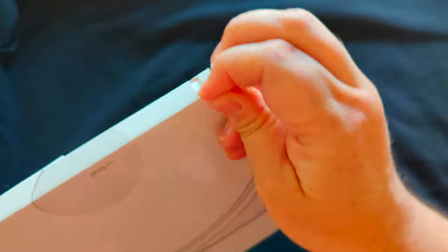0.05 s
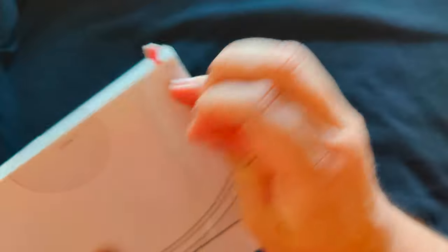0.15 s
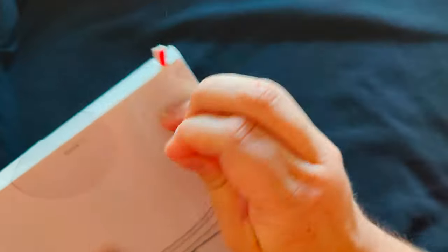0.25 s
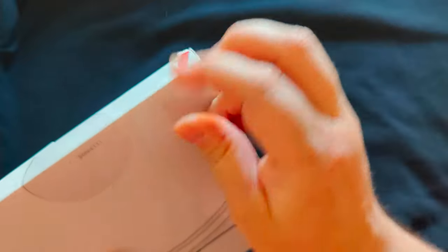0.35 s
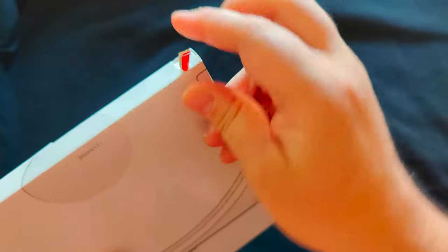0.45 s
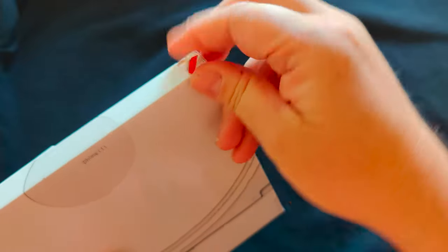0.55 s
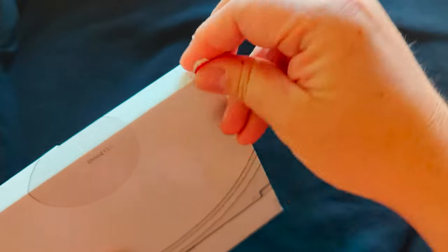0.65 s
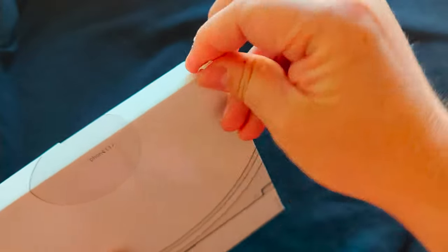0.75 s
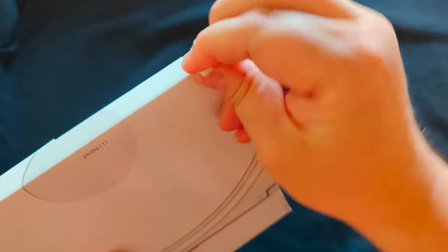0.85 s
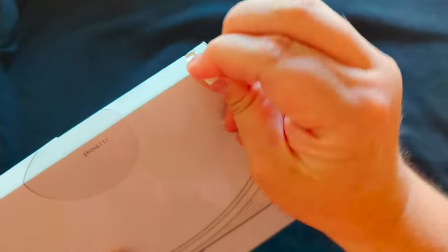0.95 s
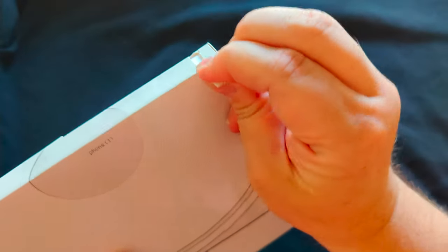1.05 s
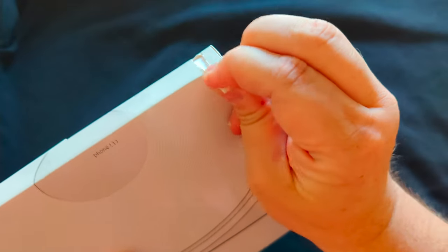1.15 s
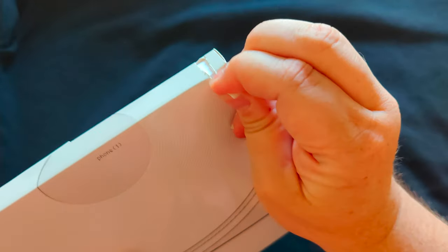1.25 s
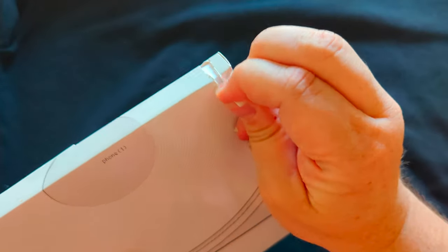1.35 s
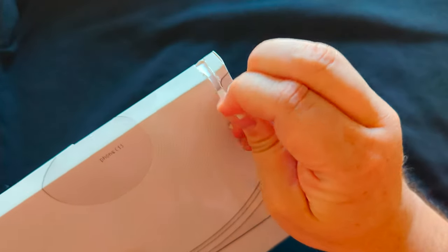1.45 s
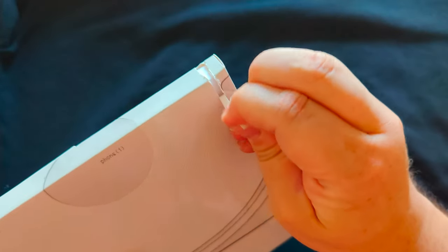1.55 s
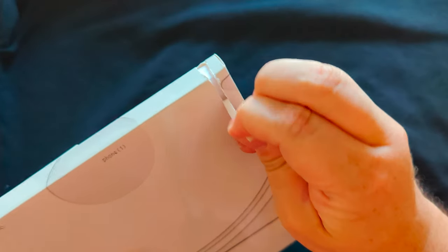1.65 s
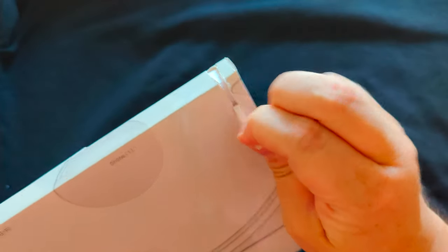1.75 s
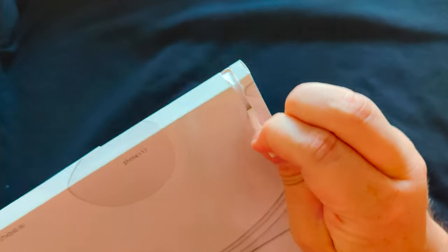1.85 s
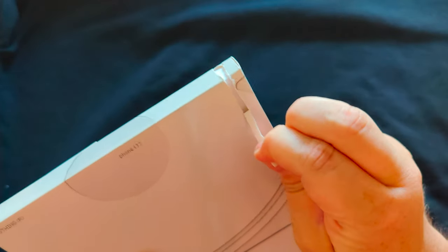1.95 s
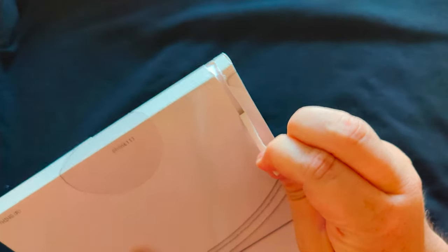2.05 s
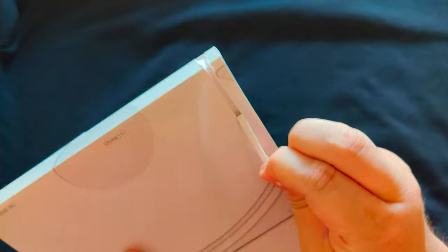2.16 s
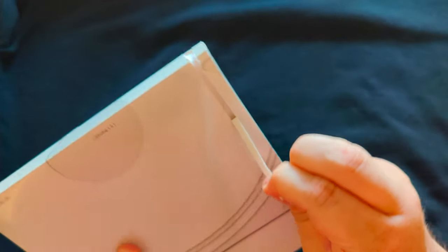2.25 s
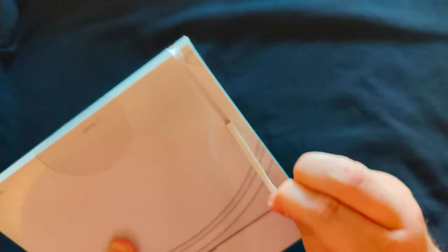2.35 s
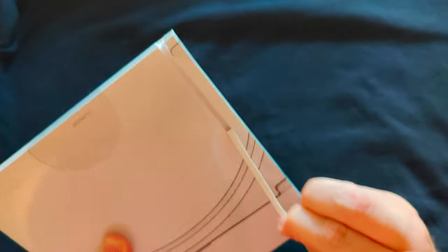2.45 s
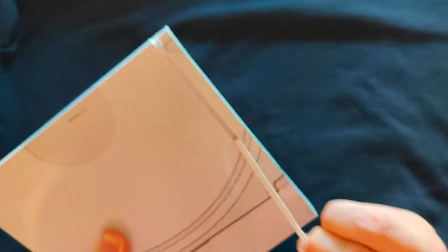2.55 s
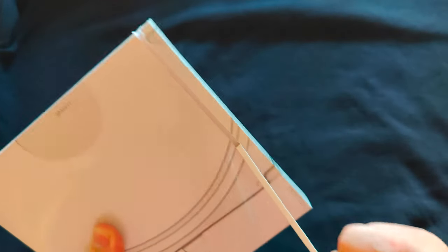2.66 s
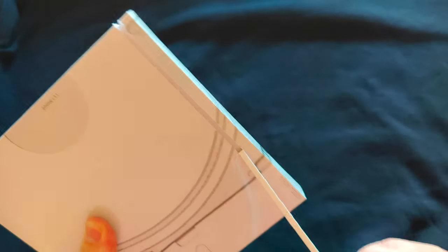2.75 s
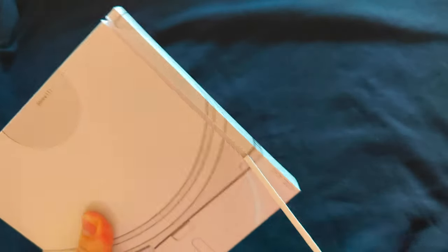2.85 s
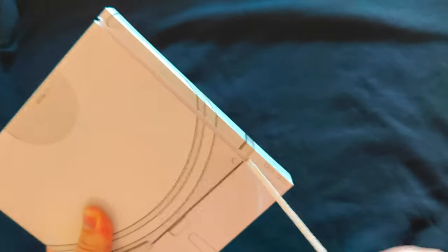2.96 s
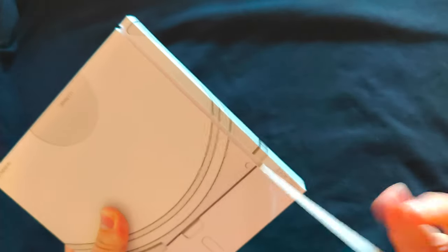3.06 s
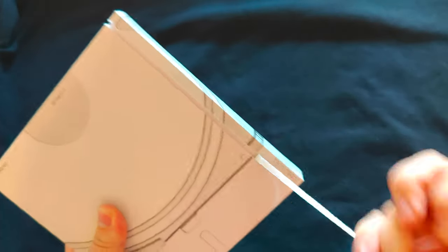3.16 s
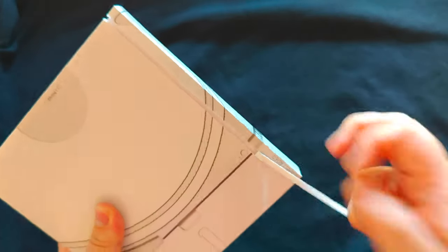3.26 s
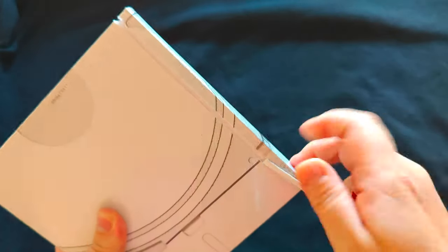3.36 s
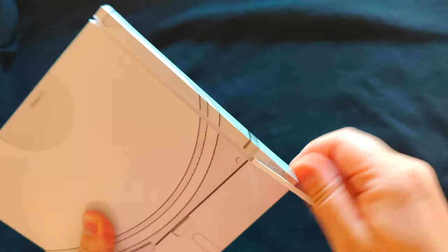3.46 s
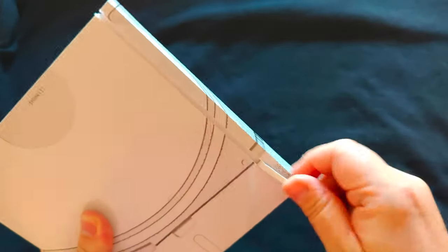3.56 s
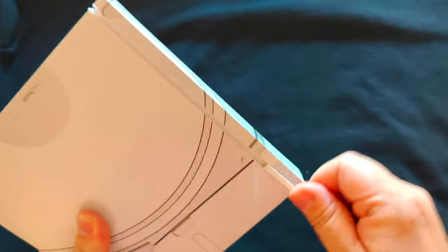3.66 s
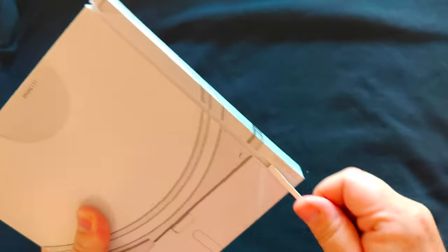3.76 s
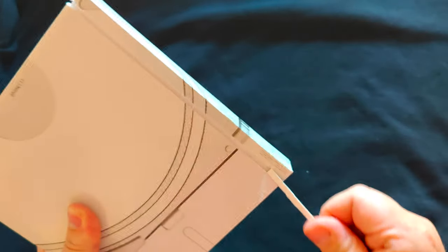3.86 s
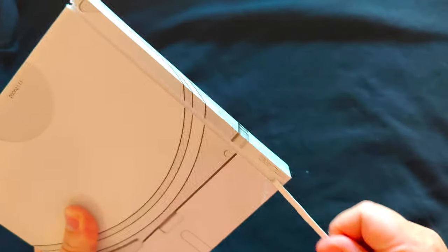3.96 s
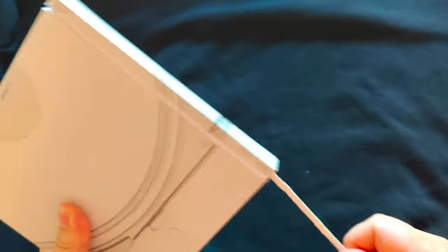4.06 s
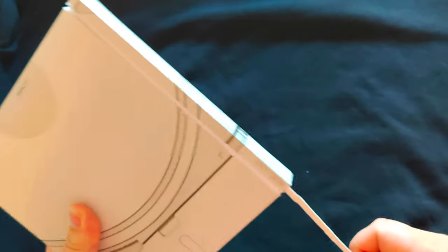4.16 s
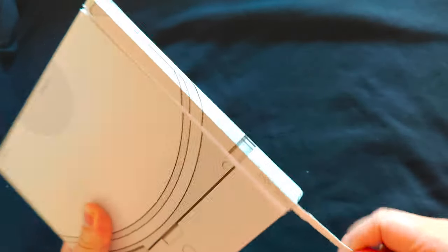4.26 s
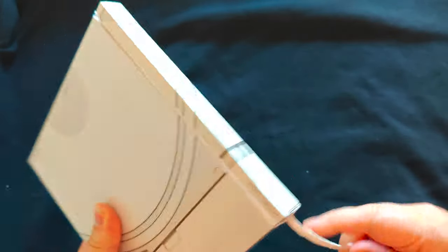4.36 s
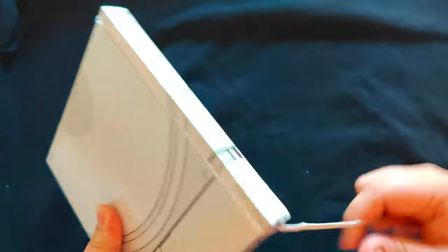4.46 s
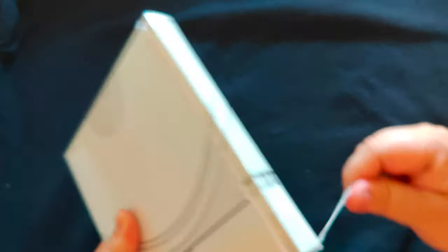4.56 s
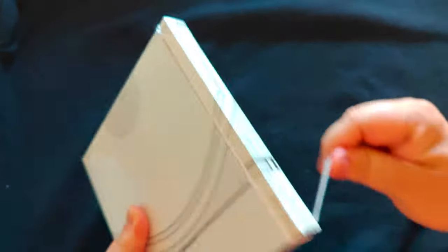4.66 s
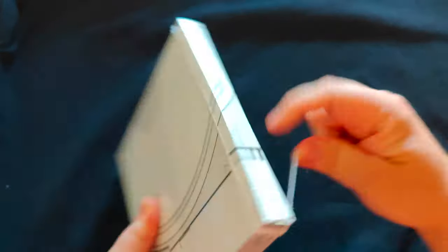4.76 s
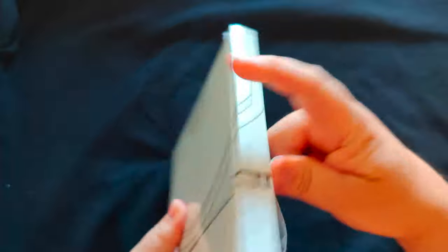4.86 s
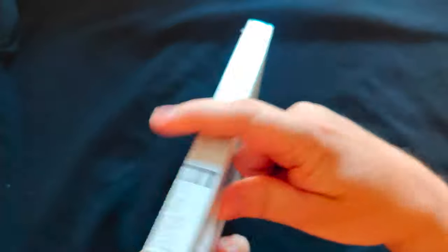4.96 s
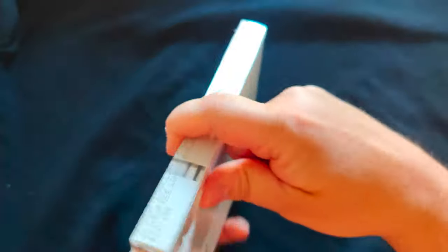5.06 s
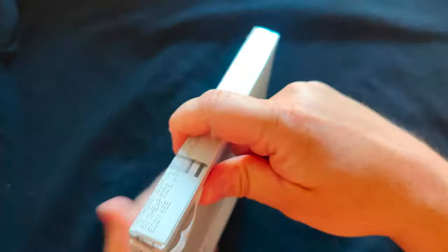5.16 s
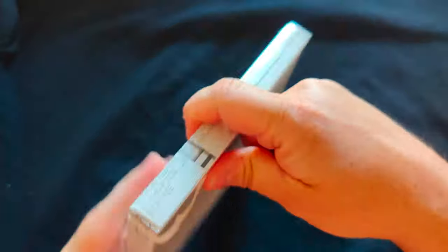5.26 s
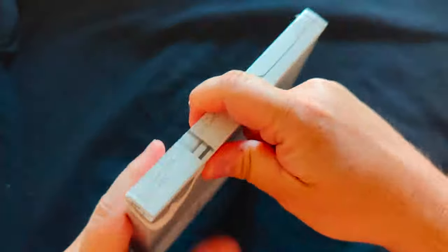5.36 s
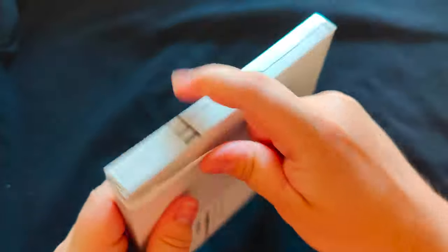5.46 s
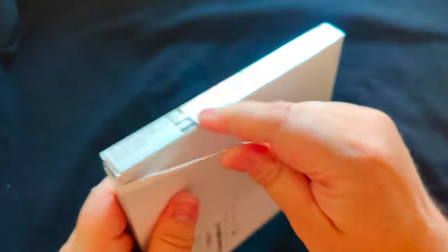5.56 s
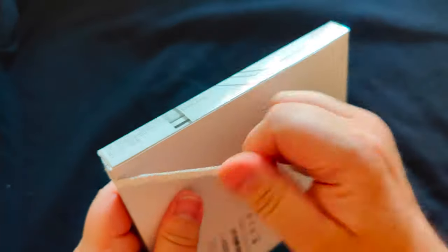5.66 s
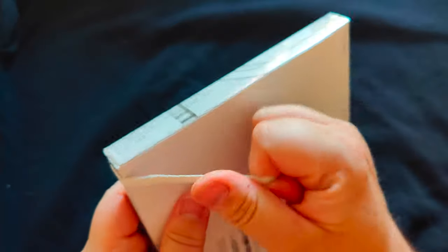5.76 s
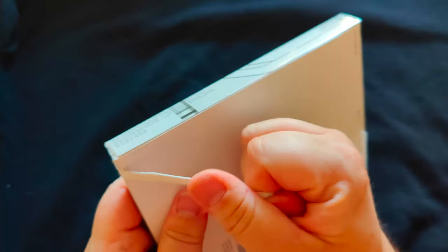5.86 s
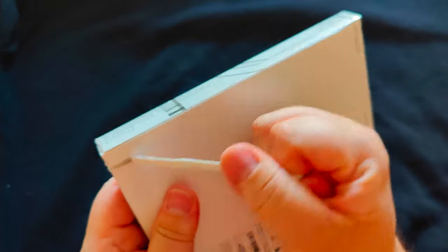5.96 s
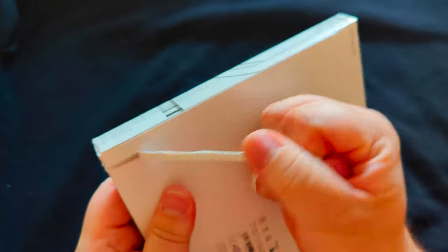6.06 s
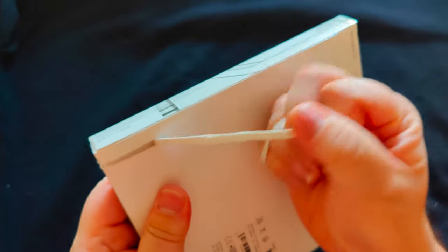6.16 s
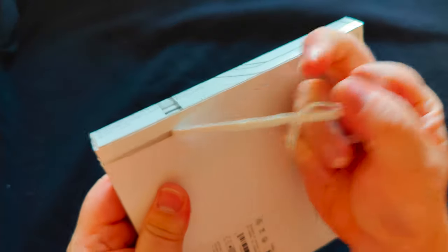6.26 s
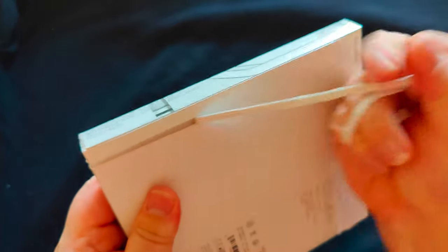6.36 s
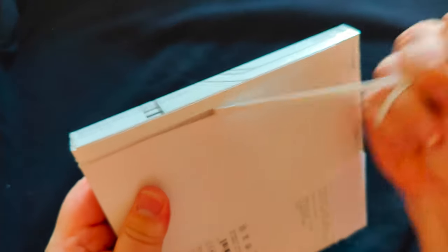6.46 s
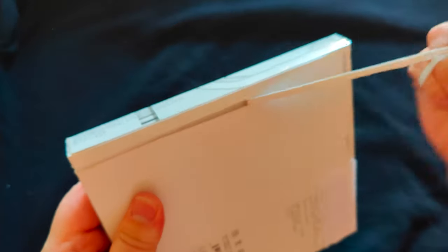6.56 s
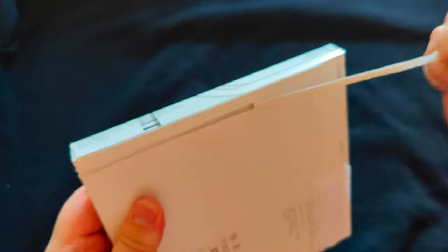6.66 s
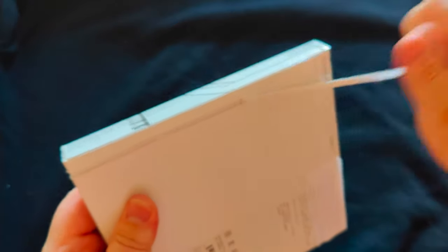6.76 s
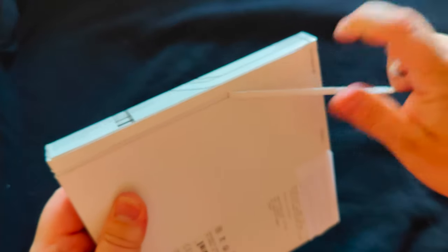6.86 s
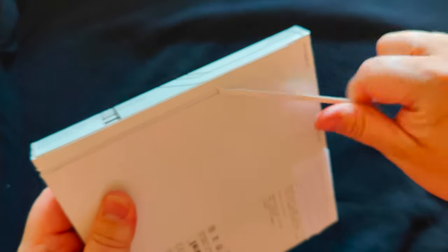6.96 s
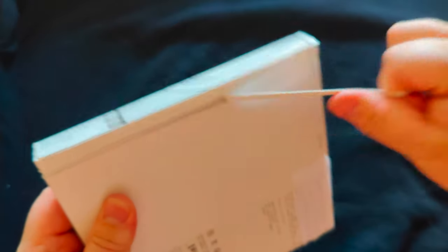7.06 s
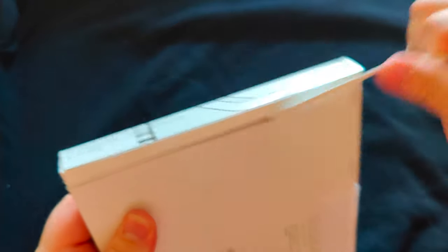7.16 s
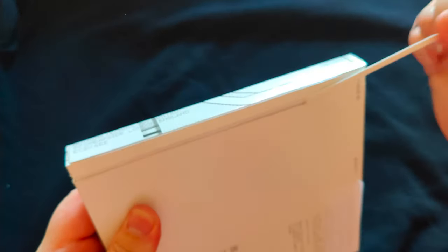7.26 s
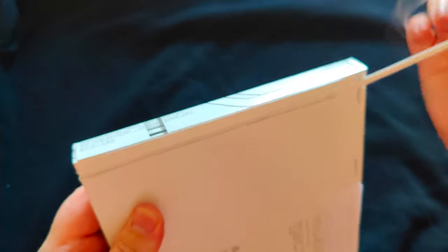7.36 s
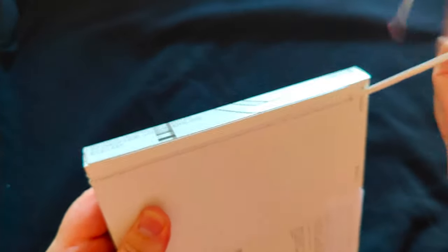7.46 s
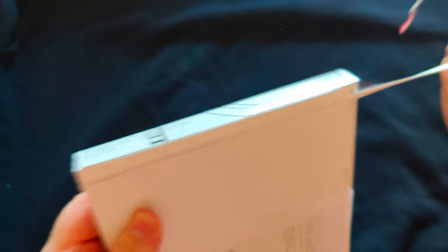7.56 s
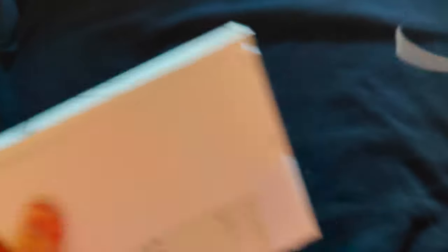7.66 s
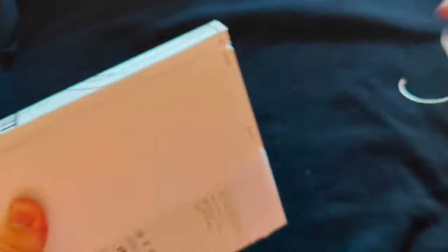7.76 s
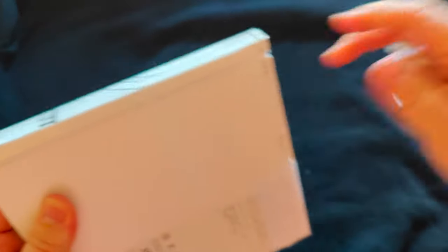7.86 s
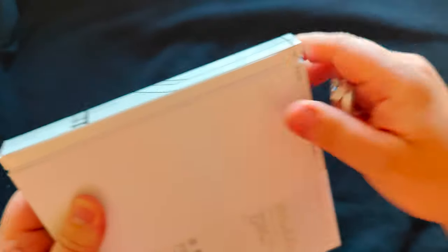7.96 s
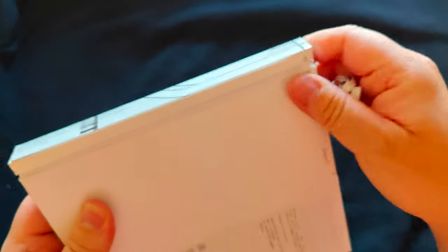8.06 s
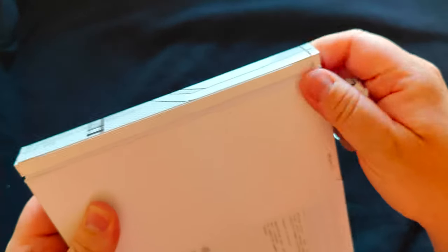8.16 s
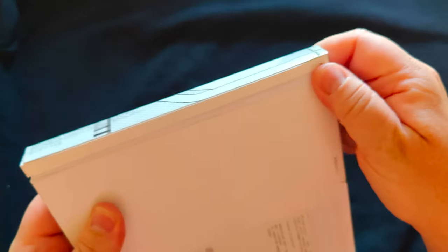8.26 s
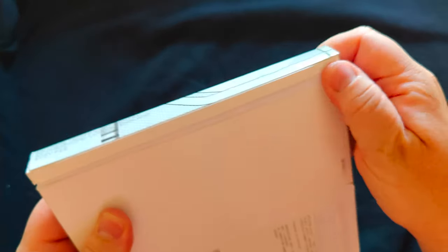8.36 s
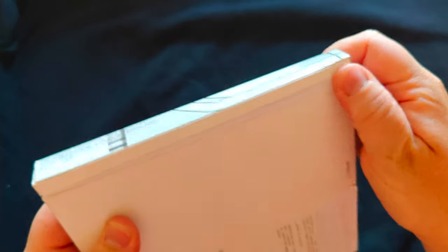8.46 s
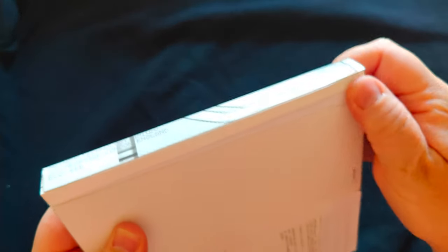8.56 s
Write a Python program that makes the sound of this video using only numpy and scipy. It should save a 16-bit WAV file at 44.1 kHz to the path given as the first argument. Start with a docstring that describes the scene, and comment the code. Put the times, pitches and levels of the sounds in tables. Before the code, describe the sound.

A hollow card box is opened by its tear strip, heard close up. Crackling, fibrous rips come in five pulls: tentative, long, short, then strong and fast, then brief and sizzling. Between them come dry finger rustles, sharp nail snaps, dull hollow taps and small low creaks of the box. The taut strip faintly rings and squeaks. The room is small and still, with short echo, faint low hum and soft hiss.

```python
"""Tear strip on a cardboard box

Small quiet room, flat hollow box close to the microphones: a tear strip is pulled round it in five pulls.
Fibres snap by the thousand along the front, then the back: bursts of noise crackle and shake box resonances.
The strip catches once and judders; it rings while taut, and narrow gliding noise gives groans and squeaks.
Fingers rustle, snap, tick and knock on the box; behind lie the room echo, still air, hum and a soft hiss.
"""
import sys
import numpy as np
from scipy import signal
from scipy.fft import rfft, irfft
from scipy.io import wavfile
from scipy.ndimage import uniform_filter1d, map_coordinates

SR = 44100
rng = np.random.default_rng(int(sys.argv[2]) if len(sys.argv) > 2 else 0)


def transcribe(signal):
    """Save signal, clipped to [-1, 1], as a 16-bit WAV file at the path in sys.argv[1]."""
    frames = np.atleast_2d(signal).T
    limited = np.clip(frames, -1, 1)
    pcm = np.round(limited * 32767).astype(np.int16)
    wavfile.write(sys.argv[1], SR, pcm)


N = 379911
TIME = np.arange(N) / SR

# Effort of each pull, which drives all its layers: t/s, level/dB
PEEL_EFFORT = [(1.22, -66.5), (1.402, -69), (1.446, -51.5), (1.504, -49.5), (1.546, -64.5), (1.676, -50),
               (1.79, -75), (1.814, -68), (1.86, -77)]
FRONT_EFFORT = [(1.915, -65), (1.971, -50), (2.043, -57), (2.115, -57), (2.121, -51.5), (2.177, -48.5),
                (2.201, -53), (2.475, -45), (2.557, -49.5), (2.673, -45), (2.863, -50), (2.985, -48),
                (3.1, -86.5)]
CORNER_EFFORT = [(3.59, -75), (3.598, -70), (3.71, -47.5), (3.722, -61), (3.758, -60), (3.864, -48.5),
                 (4.016, -57), (4.09, -51.5), (4.122, -41.5), (4.162, -59.5), (4.28, -76.5)]
BACK_EFFORT = [(5.968, -55), (6.006, -41), (6.05, -46.5), (6.064, -52), (6.082, -57), (6.09, -45.5),
               (6.098, -48), (6.192, -40), (6.26, -56), (6.332, -41), (6.464, -46), (6.582, -40),
               (6.668, -58.5), (6.746, -54), (6.84, -86)]
FINISH_EFFORT = [(7.16, -81), (7.196, -66.5), (7.256, -49.5), (7.316, -51.5), (7.33, -52.5), (7.378, -51.5),
                 (7.482, -49.5), (7.548, -68), (7.654, -45.5), (7.668, -76), (7.72, -69)]
# Relative colour of the snapping fibres on each pull, and under the fingers: f/Hz, density/(dB per Hz)
PEEL_COLOUR = [(900, -36), (1500, -5.5), (1950, -22), (2300, -4), (3300, -6), (3650, -8), (4300, -4.5),
               (5200, -8.5), (6200, -9.5), (10000, -8), (14000, -4)]
FRONT_COLOUR = [(880, -13), (1500, -5), (1690, -6.5), (2020, -13), (2480, 1), (2940, -1), (3290, -1.5),
                (4690, -2), (5710, -6.5), (7630, -4.5), (8530, -7), (10100, -1.5), (13400, 5.5), (14000, 5)]
CORNER_COLOUR = [(880, -39), (1500, -3), (2560, -6), (3230, 1), (5200, -3), (6090, 0.5), (6630, -4.5),
                 (7490, 3.5), (8690, -4.5), (14000, 10.5)]
BACK_COLOUR = [(880, -16), (1500, -6), (1860, -16.5), (2350, -6), (2650, -11), (2830, -7.5), (3710, -1),
               (5200, -2), (6690, -4.5), (7700, 1), (8530, -5), (9910, -3), (11100, -1.5), (14000, 4)]
FINISH_COLOUR = [(880, -39), (1500, -10.5), (3320, -11.5), (4150, -7.5), (4820, -9), (5350, -11),
                 (6040, -10), (6950, -11), (10300, -9), (14000, -4)]
HANDLING_COLOUR = [(880, -35), (1500, -4), (2460, -7.5), (3050, -4), (3410, -5), (4120, -0.5), (11900, -3),
                   (14000, -6)]
# Balance and place of each pull, levels against its effort (sizzle and shaking as at mid-pull):
# crackle/dB, sizzle/dB, box flex/dB, panel rattle/dB, right-channel lag/ms, left upper-mid boost/dB
PEEL_BALANCE = (-3, -9.5, -21, -15.5, 0.7, 2)
FRONT_BALANCE = (-1.5, -3, -9, -8.5, -0.1, 2)
CORNER_BALANCE = (-1.8, -1, -7.5, -6, 0, 1)
BACK_BALANCE = (-1.7, -0.5, -20, -9.5, 0.4, 2.8)
FINISH_BALANCE = (-1.7, 6.5, -6.5, -2, 0.1, -2)
# From start to end of a pull the freed strip lengthens: more sizzle, less shaking of the box
SIZZLE_RISE_DB, SHAKE_FALL_DB = 7, 5
SHAKE_GROWTH = 1.39   # dB of shaking per dB of effort
SWAY_DB, SWAYS_PER_S = 1.5, 18   # the shaking comes and goes as the box shifts in the hand
# Slow bending modes of the whole box, before hand damping: f/Hz, width/Hz, level/dB
FLEX_MODES = [(135, 43, 0), (234, 30, -0.5), (302.5, 73, -6.5), (369, 54, -1.5), (427, 240, 2)]
# Quicker modes of the panels, before hand damping: f/Hz, width/Hz, level/dB
PANEL_MODES = [(703, 186, 10), (820, 97, -14), (950, 120, -3.5), (1100, 750, -6), (1260, 120, -14),
               (1780, 670, 6)]
HAND_DAMPING = 2.7   # how many times the grip widens these modes in a knock
# The strip catches once
JUDDER_S, JUDDER_HOLD_S, JUDDER_DB, SLIPS_PER_S = 6.524, 0.07, -44, 315
JUDDER_ATTACK_S, JUDDER_RELEASE_S = 0.0067, 0.033
# Ring of the taut strip in the first two pulls, rising as the tear runs on: t/s, f/Hz
RING_PITCH = [(1.45, 2526), (2.05, 2595), (2.55, 2923), (3.0, 3033)]
PEEL_RING_DB, FRONT_RING_DB = -8, -12   # against the effort
# Resonance of the back wall, lower as more of it comes loose: t/s, f/Hz
WALL_PITCH = [(6.1, 950), (6.21, 720), (6.36, 640), (6.47, 420), (6.6, 378.6)]
WALL_DB, WALL_HALF_WIDTH_HZ = -12, 130   # level against the effort
# Groans of the box as the grip tightens or slides: start/s, length/s, first f/Hz, last f/Hz, level/dB
GROANS = [(.176, 0.022, 190.2, 179, -46.5), (.24, 0.067, 176.3, 196, -62), (2.14, .13, 240.2, 215, -60.5),
          (2.43, .12, 204.7, 180.4, -55), (2.61, .12, 215.9, 201.5, -54), (3.605, 0.098, 235, 255, -54),
          (3.745, 0.094, 300, 225, -51), (3.89, 0.13, 238.7, 188.3, -53), (4.01, .12, 150, 130, -55.5),
          (5.015, .06, 309, 270, -63), (5.805, 0.061, 310, 214.5, -54.5),
          (5.868, 0.041, 189.9, 160.4, -49.5), (5.915, 0.051, 151, 128, -52), (7.205, .06, 201, 330, -57),
          (7.644, 0.029, 310, 442, -46.5), (8.19, 0.095, 389, 428, -70)]
# Squeaks of the strip dragging through the slit: start/s, length/s, first f/Hz, last f/Hz, level/dB
SQUEAKS = [(5.985, 0.057, 5060, 4960, -43), (6.29, .09, 5380, 5400, -44.5), (7.324, 0.017, 4890, 5130, -43)]
# Fingers and loose strip sliding on the box: start/s, length/s, level/dB,
# sizzle against level/dB, shaking of the box against level/dB
RUSTLES = [(0.0, 0.076, -68, -1, -2), (0.067, 0.078, -64.5, -7, -12), (0.183, 0.15, -72, -11, 7.5),
           (0.923, 0.065, -57.5, -5, -10.5), (0.997, .1, -71.5, -12, -22), (1.121, 0.082, -63, -5, -24),
           (1.197, 0.11, -73, -6, -21), (3.17, 0.095, -75.5, -10, -4), (3.315, 0.054, -69.5, 3, -26),
           (4.323, 0.071, -77, 4, 2), (4.524, 0.23, -76, 4, -2.5), (4.842, 0.19, -64.5, -4, -12),
           (4.923, .035, -66, -10, 9), (4.996, 0.11, -76, -1, 6), (5.095, 0.08, -71.5, -13, -16),
           (5.196, 0.065, -78, -12, 3), (5.278, .05, -72, -13, -13), (5.465, .04, -68, -11, 0),
           (5.49, .11, -81, -10, 6), (5.664, 0.13, -69, 6.5, -14), (7.107, 0.052, -75, 12.5, -11),
           (7.187, 0.034, -61.5, 9, -16), (7.559, 0.084, -63.5, 15, -10), (7.723, 0.039, -62, 0, -20),
           (8.025, 0.034, -76, 3, 8), (8.478, 0.12, -74.5, -9, -10)]
RUB_PEAK_SHARE, RUSTLE_PEAK_SHARE = 0.4, 0.26   # how far into a stroke it is loudest
# Sharp snaps of card and fingernail: t/s, centre peak/dB,
# filter gains against the 3540-8300 Hz band: bite/dB, sizzle/dB
SNAPS = [(0.188, -33.5, -13, 6), (.195, -30, -9, -11), (.935, -42.5, -8, 9), (1.1501, -42.5, -1, -12),
         (1.206, -36.5, 2.5, 0), (1.448, -32.5, 10, 2), (1.4555, -35, 4, 6), (1.6184, -35, 3, 2),
         (1.668, -32.5, 18, 2), (1.8118, -44.5, 27, -6), (1.907, -38.5, 36, -6), (2.1229, -33, -11, 3),
         (2.6854, -31, -6, 14), (3.164, -51.5, 29, -5), (3.332, -43.5, -17, 5), (3.4885, -29, -30, -3.5),
         (3.5512, -40, 14, 6), (3.704, -29, -6, -20), (4.1219, -26, -8, 1), (4.6178, -48.5, -10, 13),
         (4.9334, -45, 12, -6), (4.9978, -40.5, 20, 6), (5.3143, -40, 19, 1), (5.3536, -31.5, 17.5, 3),
         (5.484, -34, 0, -8.5), (5.512, -45, 11, 10), (5.668, -41.5, -9, -8), (5.7595, -47, -9, 14),
         (5.7842, -42, -26, -14), (5.955, -34, 10, -4), (6.0891, -30.5, 4, -20), (6.8687, -34.5, -18, 3),
         (7.5092, -37, -16, 4), (7.57, -38, -19, 14), (7.5814, -38, -19, 18), (7.616, -34, -2, 20),
         (7.6274, -43, -13, 19), (7.6442, -28, 8, 9), (7.739, -42, -15, -2), (8.082, -51, 13, 0)]
SNAP_T60_S = 0.0057
# Loose strip brushing on after a snap: t/s, starting level/dB, t60/s
BRUSHES = [(0.189, -58, 0.1), (3.49, -58.5, 0.35), (5.353, -50.5, 0.19)]
# Knocks and pops of the box, duller under a soft fingertip:
# t/s, peak/dB, relative thud/dB, relative flex/dB, relative panel/dB, top f/Hz
KNOCKS = [(.184, -50, -12, -2, 2, 2400), (.194, -39.5, -6, -10, -11, 2400), (.936, -53, -6, -11, -2, 2500),
          (3.425, -52, -25, 0, -12, 2500), (3.489, -40, -27, -9, -8, 2520),
          (3.553, -45.5, -25, -6.5, -12, 2500), (3.703, -35, -30, -23, 4, 2500),
          (4.134, -37, -30, -15, 3, 2500), (4.933, -40.5, -25, -4, -1, 2800),
          (4.9961, -27, -27, -9.5, -18, 2500), (5.355, -37.5, -9.5, -13, -17.5, 1600),
          (5.484, -35, -10.5, -14, -2.5, 2200), (5.51, -34.5, -30, -3, -4.5, 2500),
          (5.667, -51, -17, -19, -14, 1190), (5.784, -23, -22, -8.5, -10.5, 1310),
          (5.9568, -27, -24, -20.5, -13.5, 2400), (7.648, -36, -34, -9, -9, 2000),
          (8.597, -43, -35, -41, -1, 1110)]
# Faint ticks of the card in the holding hand; the spread adds to the level at random
TICKS_PER_S, TICK_DB, TICK_SPREAD_DB = 9, -66, 4
# Room echo by band: low f/Hz, high f/Hz, t60/s, level before band-pass/dB
ROOM = [(84, 326, 0.33, -7.5), (520, 1200, 0.27, -7), (1920, 12400, 0.23, -5.5), (7000, 9400, 0.076, -11)]
# Relative colour of the still room: f/Hz, density/(dB per Hz)
AIR_COLOUR = [(15, -37), (25, -1.5), (53, -2), (102, -15.5), (137, -17.5), (249, -17.5), (394, -20.5),
              (439, -20), (503, -25), (545, -24), (695, -27), (988, -23.5), (3430, -38), (14400, -40.5),
              (16000, -33)]
AIR_DB = -66.5
HUM_HZ, HUM_HALF_WIDTH_HZ, HUM_DB = 60.4, 4.7, -76
HISS_FROM_S, HISS_RISE_S, HISS_DB = 3, 2.9, -77
CUTOFF_HZ = 16100


def strip():
    """The strip tears along the box; effort drives every layer, and each pull has its own colour and place."""
    pulls = [(PEEL_EFFORT, PEEL_COLOUR, PEEL_BALANCE), (FRONT_EFFORT, FRONT_COLOUR, FRONT_BALANCE),
             (CORNER_EFFORT, CORNER_COLOUR, CORNER_BALANCE), (BACK_EFFORT, BACK_COLOUR, BACK_BALANCE),
             (FINISH_EFFORT, FINISH_COLOUR, FINISH_BALANCE)]
    stretches = []
    for pull, tone, balance in pulls:
        crackle_db, sizzle_db, flex_db, panel_db, lag_ms, pan_db = balance
        start_s, end_s = pull[0][0], pull[-1][0]
        freed = progress(start_s, end_s - start_s) - 0.5   # zero at mid-pull
        drive = effort(pull)
        shake = drive.max() * (drive / drive.max()) ** SHAKE_GROWTH
        shake = shake * from_db(-SHAKE_FALL_DB * freed)
        gains = [drive * from_db(crackle_db),
                 drive * from_db(sizzle_db + SIZZLE_RISE_DB * freed),
                 shake * from_db(flex_db),
                 shake * from_db(panel_db)]
        stretches.append((gains, tone, lag_ms, pan_db))
    front, back = stretches[:3], stretches[3:]
    gritty = fractures(per_s=550, spread_db=2.5, burst_ms=0.53, bed=0.88, pricks_per_s=45, prick_db=20.0)
    # the back tears faster
    fine = fractures(per_s=700, spread_db=2.5, burst_ms=0.5, bed=0.88, pricks_per_s=60, prick_db=16.5)
    return tear(front, gritty) + tear(back, fine)


def tear(stretches, force):
    """The same fractures crackle in the air, sizzle at the top and shake the box.

    Each stretch: (crackle, sizzle, flex and panel gains), colour, lag/ms, pan/dB.
    """
    _, sizzle_gain, flex_gain, panel_gain = sum(np.array(gains) for gains, tone, lag_ms, pan_db in stretches)
    snapping = force * stereo_noise(likeness=0.29)
    snapping = shifting_echo(snapping, delay_ms=0.436, swing=0.25, strength=0.36, per_s=9)
    crackle = 0
    for gains, tone, lag_ms, pan_db in stretches:
        coloured = band(colour(snapping, tone), 1420, 11480, order=4)
        crackle = crackle + gains[0] * place(coloured, lag_ms, pan_db)
    treble = band(force * stereo_noise(likeness=0.55), 12700, 16500, order=3)
    sizzle = sizzle_gain * rms_one(treble)
    shake = force * stereo_noise(likeness=0.86)
    shake = shifting_echo(shake, delay_ms=3.25, swing=0.247, strength=0.46, per_s=6)
    bending = flex_gain * rms_one(flex(shake) * from_db(SWAY_DB * drift(SWAYS_PER_S)))
    rattling = panel(shake) * from_db(SWAY_DB * drift(SWAYS_PER_S))
    rattle = panel_gain * place(rattling, lag_ms=0.024, pan_db=2.4)
    return crackle + sizzle + bending + rattle


def fractures(per_s, spread_db, burst_ms, bed, pricks_per_s=32, prick_db=20):
    """Force envelope: fibre bundles break in brief bursts over a bed of single fibres; stiff ones prick out."""
    sizes = from_db(spread_db * np.minimum(rng.exponential(1, N), 4))
    breaks = (rng.random(N) < per_s / SR) * sizes ** 2
    burst_decay = np.exp(-1000 / (burst_ms * SR))
    power = signal.lfilter([1], [1, -burst_decay], breaks + 1e-18)
    # the hand keeps the mean effort even
    steady = uniform_filter1d(power, size=1500) + 0.15 * power.mean()
    pricks = (rng.random(N) < pricks_per_s / SR) * from_db(prick_db)
    return np.sqrt(power / steady + abs(bed)) + pricks


def flex(force, damping=1):
    """The hollow box bending."""
    return band(resonate(force, FLEX_MODES, damping), 127, 400)


def panel(force, damping=1):
    """The stiff panels rattling."""
    return band(resonate(force, PANEL_MODES, damping), 660, 1466)


def judder():
    """Stick and slip: uneven, nearly periodic tugs on the box."""
    wobble = rms_one(uniform_filter1d(rng.standard_normal((1, N)), size=150))[0]
    slip_count = np.floor(np.cumsum(SLIPS_PER_S * (1 + 0.14 * wobble)) / SR)
    slips = np.diff(slip_count, prepend=0) * np.ones((2, 1))
    caught = progress(JUDDER_S - JUDDER_ATTACK_S, JUDDER_ATTACK_S)
    caught = caught - progress(JUDDER_S + JUDDER_HOLD_S, JUDDER_RELEASE_S)
    bending = from_db(0.5) * rms_one(band(flex(slips), 180, 1000))
    return from_db(JUDDER_DB) * caught * (bending + rms_one(panel(slips)))


def taut_strip_ring():
    """The taut strip rings with the effort of the first two pulls."""
    taut = from_db(PEEL_RING_DB) * effort(PEEL_EFFORT) + from_db(FRONT_RING_DB) * effort(FRONT_EFFORT)
    return rub(taut, np.interp(TIME, *np.transpose(RING_PITCH)), half_width_hz=110)


def back_wall():
    """The loosening back wall resonates with the effort of the tear."""
    gain = from_db(WALL_DB) * effort(BACK_EFFORT)
    return rub(gain, np.interp(TIME, *np.transpose(WALL_PITCH)), WALL_HALF_WIDTH_HZ)


def groans():
    """Creeping fingers drive a low resonance of the box."""
    return rub(*glides(GROANS), half_width_hz=58)


def squeaks():
    """The strip drags through the slit and drives a high, broad resonance."""
    return rub(*glides(SQUEAKS), half_width_hz=355)


def fingers(crackle_db=-1, panel_db=-4):
    """Skin and the loose strip slide over the card with sparse little catches."""
    gains = 0
    for s, length_s, db, sizzle_db, shake_db in RUSTLES:
        layers_db = db + np.array([crackle_db, sizzle_db, shake_db, shake_db + panel_db])
        gains = gains + np.outer(from_db(layers_db), stroke(s, length_s, RUSTLE_PEAK_SHARE))
    force = fractures(per_s=330, spread_db=5.5, burst_ms=0.99, bed=1.0)
    return tear([(gains, HANDLING_COLOUR, 0.02, 1.2)], force)


def snaps():
    """The card strains for some milliseconds, then cracks."""
    out, t = np.zeros((2, N)), TIME[:1500] - TIME[600]
    strain = (t < 0) * from_db(-23 - 60 * np.abs(t) / 0.03)
    give = (t >= 0) * from_db(-60 * np.abs(t) / SNAP_T60_S)
    for s, peak_db, bite_db, sizzle_db in SNAPS:
        burst = stereo_noise(likeness=0.13, size=len(t)) * (strain + give)
        bite = from_db(bite_db) * band(burst, 2080, 4730)
        sizzle = from_db(sizzle_db) * band(burst, 10800, 14500, order=3)
        crack = bite + band(burst, 3540, 8300) + sizzle
        crack = crack / np.abs(crack.mean(axis=0)).max()
        # slightly nearer the left
        add(out, s + t[0], from_db(peak_db) * from_db([[0.4], [-0.4]]) * crack)
    return out


def brushes():
    """After some cracks the loose strip brushes along the box: noise that dies away."""
    out = np.zeros((2, N))
    brush = rms_one(band(stereo_noise(likeness=0.36), 1500, 8300, order=1))
    for s, db, t60 in BRUSHES:
        out += brush * (TIME > s) * from_db(db - 60 * np.abs(TIME - s) / t60)
    return out


def knocks():
    """A brief push rocks the whole box and rings its modes, which the holding hand damps at once."""
    out, t = np.zeros((2, N)), TIME[:4096]
    for s, peak_db, thud_db, flex_db, panel_db, top_hz in KNOCKS:
        scrape = 0.059 * stereo_noise(likeness=0.59, size=len(t)) * from_db(-60 * t / 0.022)
        push = (t == 0) + scrape
        thud = band(resonate(push, [(123, 43, 0)]), 65, 164)
        knock = (from_db(thud_db) * rms_one(thud)
                 + from_db(flex_db) * rms_one(flex(push, HAND_DAMPING))
                 + from_db(panel_db) * rms_one(panel(push, HAND_DAMPING)))
        knock = band(knock, 36, top_hz, order=3)
        add(out, s, from_db(peak_db) * from_db([[0.5], [-0.5]]) * knock / np.abs(knock).max())
    return out


def ticks():
    """The card ticks faintly at random in the holding hand."""
    sizes = from_db(TICK_DB + TICK_SPREAD_DB * np.minimum(rng.exponential(1, N), 3))
    catches = (rng.random(N) < TICKS_PER_S / SR) * sizes
    dying = signal.lfilter([1], [1, -from_db(-60 / (SNAP_T60_S * SR))], catches + 1e-18)
    return dying * band(stereo_noise(likeness=0.28), 1000, 15000, order=1)


def room(x):
    """Diffuse echoes swell in over a few milliseconds and die sooner in the treble."""
    t = TIME[:20000]
    onset = 1 - np.exp(-(t / 0.0015) ** 2)
    response = 0
    for low_hz, high_hz, t60, db in ROOM:
        # the microphones hear the low echoes more alike
        tail = stereo_noise(likeness=np.exp(-low_hz / 700), size=len(t)) * from_db(-60 * t / t60) * onset
        tail = tail / np.sqrt(np.sum(tail ** 2) / 2)
        response = response + from_db(db) * band(tail, low_hz, high_hz)
    return signal.oaconvolve(x, response, axes=1)[:, :N]


def air():
    """Still air: faint rumble, alike on both sides, and a thin hiss that is not."""
    rumble = band(stereo_noise(likeness=0.93), 40, 600, order=1)
    thin_hiss = band(stereo_noise(likeness=0.044), 600, 23000, order=2)
    return from_db(AIR_DB) * rms_one(colour(rumble + thin_hiss, AIR_COLOUR, size=8192))


def hum():
    """A low wavering hum in the room: a narrow band of noise, alike on both sides."""
    return rub(from_db(HUM_DB), np.full(N, HUM_HZ), HUM_HALF_WIDTH_HZ)


def soft_hiss():
    """A soft hiss around 1 kHz that fades in through the middle."""
    hiss = rms_one(band(stereo_noise(likeness=0.36), 800, 1140))
    return from_db(HISS_DB) * progress(HISS_FROM_S, HISS_RISE_S) * hiss


def rub(gain, hz, half_width_hz):
    """Friction drives one resonance, whose pitch follows the grip: slow noise shifted up to that pitch."""
    turn = np.exp(2j * np.pi * np.cumsum(hz) / SR)
    creep = stereo_noise(likeness=0.99) + 1j * stereo_noise(likeness=0.96)
    swell = signal.sosfilt(signal.butter(2, half_width_hz, fs=SR, output="sos"), creep)
    return gain * rms_one((swell * turn).real)


def resonate(x, modes, damping=1):
    """Parallel resonances; a firm grip widens them."""
    out = 0
    for hz, width, db in modes:
        r = np.exp(-np.pi * width * damping / SR)
        feed = np.array([1, 0, -1]) * (1 - r * r) / 2
        feedback = [1, -2 * r * np.cos(2 * np.pi * hz / SR), r * r]
        out = out + from_db(db) * signal.lfilter(feed, feedback, x + 1e-18)
    return out


def shifting_echo(x, delay_ms, swing, strength, per_s):
    """Sound glancing off the moving hand and box: a comb of peaks that wanders as they move."""
    delay = delay_ms / 1000 * np.exp(swing * uniform_filter1d(drift(per_s), size=256))
    return x + strength * np.array([np.interp(TIME - delay, TIME, side) for side in x])


def place(x, lag_ms, pan_db):
    """Delay the right microphone by the lag, boost the left in the upper middle, and level the pair."""
    left = x[0] + (from_db(pan_db) - 1) * band(x[0], 920, 4400, order=1)
    right = np.interp(TIME - lag_ms / 1000, TIME, x[1])
    return rms_one(np.array([left, right]))


def effort(pull):
    """Gain in time from a pull's curve; silent outside it."""
    s, db = np.transpose(pull)
    return from_db(np.interp(TIME, s, db)) * (TIME >= s[0]) * (TIME <= s[-1])


def progress(s, length_s):
    """Runs from 0 to 1 over a stretch of time."""
    return np.clip((TIME - s) / length_s, 0, 1)


def stroke(s, length_s, peak_share):
    """A hand movement swells and dies away smoothly."""
    peak_s = s + length_s * np.clip(peak_share, 0, 1)
    return np.sin(np.pi / 2 * np.interp(TIME, [s, peak_s, s + length_s], [0, 1, 0]))


def glides(rows):
    """Gain and pitch of a row of rubbing strokes, each gliding from its first pitch to its last."""
    gain, pitch = 0, []
    for s, length_s, first_hz, last_hz, db in rows:
        gain = gain + from_db(db) * stroke(s, length_s, RUB_PEAK_SHARE)
        pitch += [(s, first_hz), (s + length_s, last_hz)]
    return gain, np.interp(TIME, *np.transpose(pitch))


def drift(per_s):
    """A slow random wander around zero, through per_s random points a second."""
    steps = rng.standard_normal(400)
    return map_coordinates(steps, [TIME[::64] * per_s], order=3, mode="wrap").repeat(64)[:N]


def stereo_noise(likeness, size=N):
    """White noise, partly shared by left and right."""
    mid, side = rng.standard_normal((2, size))
    likeness = np.clip(likeness, 0, 1)
    return np.sqrt(1 + likeness) * mid + np.sqrt(1 - likeness) * side * np.array([[1], [-1]])


def colour(x, spectrum, size=1024):
    """Causal (minimum-phase) filter with the given spectrum, by folding its cepstrum."""
    hz, db = np.transpose(spectrum)
    grid = np.maximum(np.arange(size // 2 + 1) * SR / size, 1)
    cepstrum = irfft(np.log(from_db(np.interp(np.log(grid), np.log(hz), db))))
    cepstrum[1:size // 2] *= 2
    cepstrum[size // 2 + 1:] = 0
    response = irfft(np.exp(rfft(cepstrum)))
    return signal.oaconvolve(x, response[None], axes=1)[:, :N]


def band(x, low_hz, high_hz, order=2):
    """Causal band-pass."""
    sos = signal.butter(order, [low_hz, min(high_hz, SR / 2 - 1)], "band", fs=SR, output="sos")
    return signal.sosfilt(sos, x + 1e-18)


def from_db(db):
    """Amplitude ratio of a level in dB."""
    return 10 ** (np.asarray(db) / 20)


def rms_one(x):
    """Scale the channels so that their mean has rms 1."""
    return x / np.sqrt(np.mean(x.mean(axis=0) ** 2) + 1e-20)


def add(out, s, sound):
    """Mix a short sound in at time s."""
    start = max(round(s * SR), 0)
    out[:, start:start + sound.shape[1]] += sound[:, :max(N - start, 0)]


def scene():
    """The box close by, its echo in the small room, and the room's own quiet noise."""
    tearing = strip() + judder() + taut_strip_ring() + back_wall() + squeaks()
    handling = groans() + fingers() + snaps() + brushes() + knocks() + ticks()
    box = tearing + handling
    return box + room(box) + air() + hum() + soft_hiss()


def record(dry):
    """The top is cut steeply."""
    return signal.sosfilt(signal.ellip(12, 0.1, 75, CUTOFF_HZ, fs=SR, output="sos"), dry)


dry = scene()
out = record(dry)
transcribe(out)
```